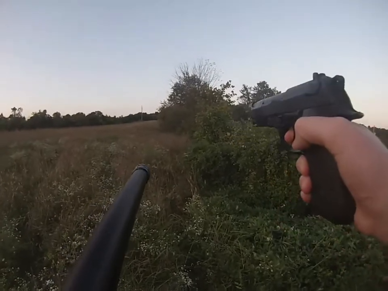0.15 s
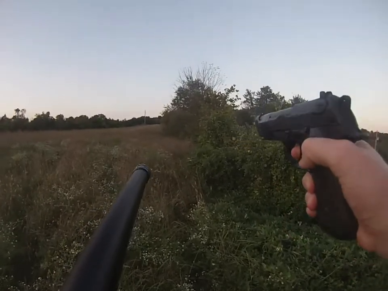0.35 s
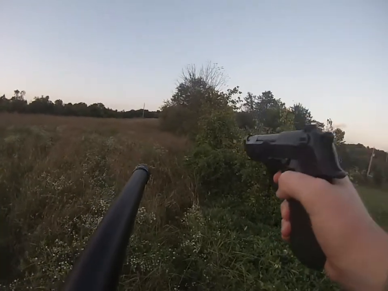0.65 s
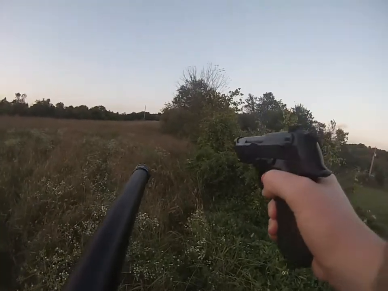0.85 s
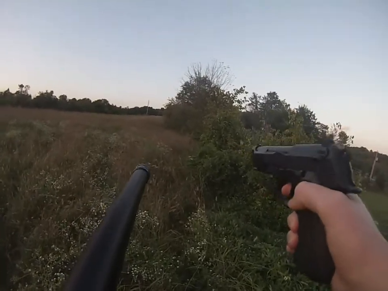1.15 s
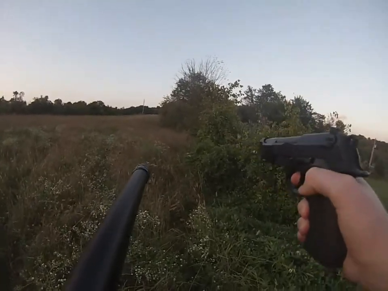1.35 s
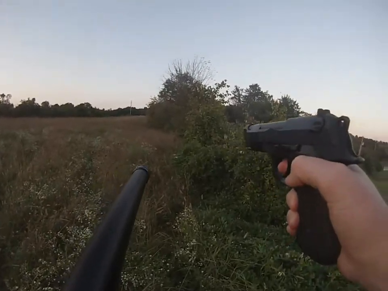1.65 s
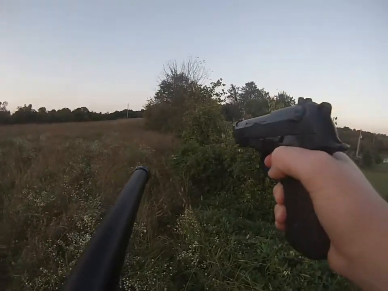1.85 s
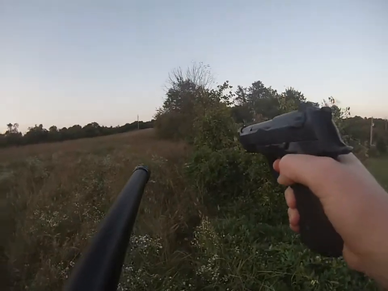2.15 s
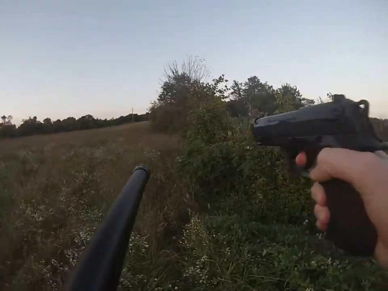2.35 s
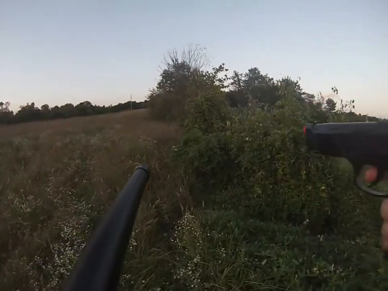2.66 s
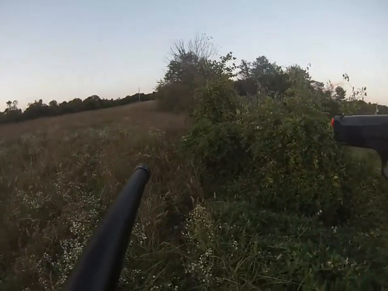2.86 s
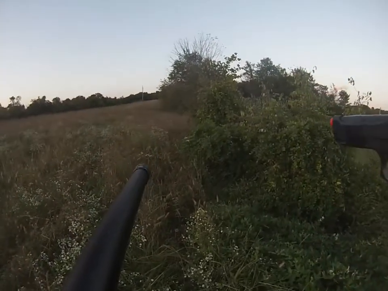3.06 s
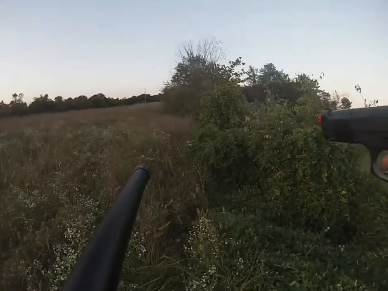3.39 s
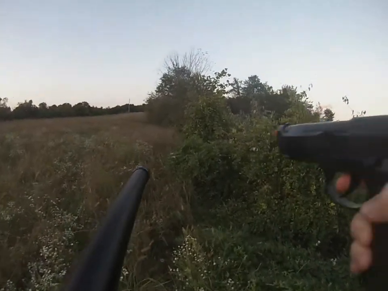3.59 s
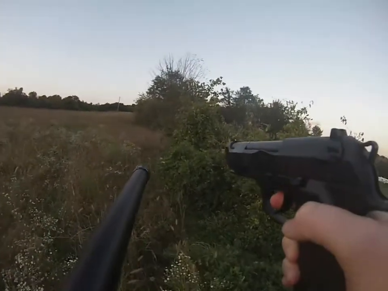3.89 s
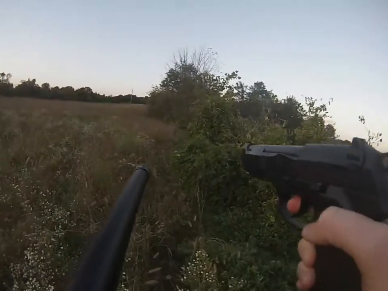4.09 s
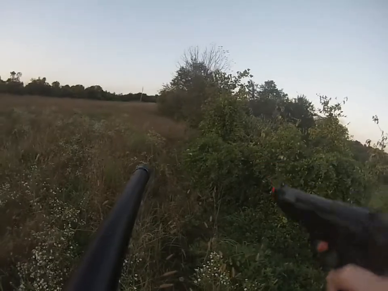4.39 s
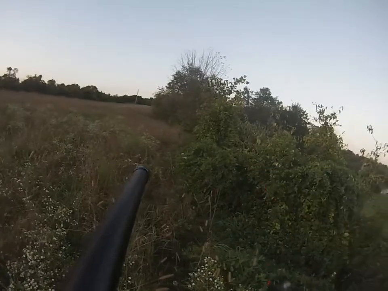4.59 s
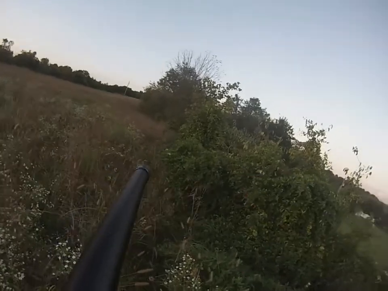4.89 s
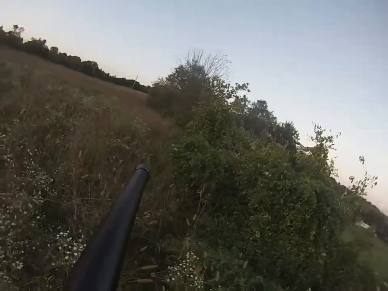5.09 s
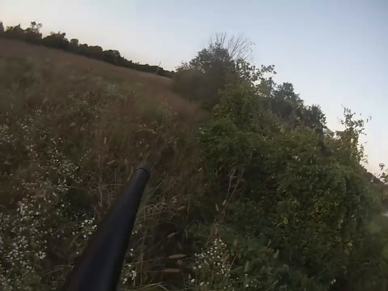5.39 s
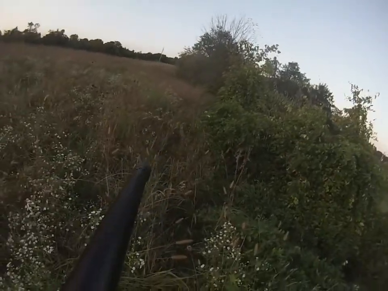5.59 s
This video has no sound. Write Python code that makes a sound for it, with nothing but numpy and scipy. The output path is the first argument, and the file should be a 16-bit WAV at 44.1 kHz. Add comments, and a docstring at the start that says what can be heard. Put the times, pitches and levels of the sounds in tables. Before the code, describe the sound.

A quiet outdoor creep through dry field grass. Small hollow plastic clicks and brief creaks are loudest and very near, with low thuddy body, bunching at about 2.8 and 5.3 seconds. Gentle brushing swells and tiny bright stalk snaps come between them. Far insects shimmer continuously behind soft wind rumble and airy rush. One open-air microphone, dry, no echo.

```python
"""A long camera mount ticks, creaks and sways against its plastic housing during a creep through dry grass.
Each slip rings decaying housing modes with a burst of grit; friction noise drives the same modes to creak.
Grainy noise makes the swishing stalks and leaf tips, and short pitched bursts make the snaps underfoot.
Behind them, pulsed tones form two far insect choruses, and shaped noise makes a light breeze."""
import sys
import numpy as np
from scipy import signal
from scipy.fft import rfft, irfft, next_fast_len
from scipy.io import wavfile
from scipy.ndimage import uniform_filter1d, map_coordinates

SR = 44100
rng = np.random.default_rng(int(sys.argv[2]) if len(sys.argv) > 2 else 0)


def waveform_to_disk(signal):
    """Save audio, clipped to [-1, 1], as 16-bit WAV at the path in sys.argv[1]."""
    frames = np.transpose(np.atleast_2d(signal))
    scaled = np.clip(frames, -1, 1) * 32767
    samples = np.round(scaled).astype(np.int16)
    wavfile.write(sys.argv[1], SR, samples)


N = 253134

# Slips of the mount: t/s, relative ring level/dB, hardness (about 0 to 1),
# breadth of contact (about -1 to 1, a few beyond), clack level/dB against the ring
SLIPS = [(0.321, -34, 0.65, 0.4, -5), (0.564, -52.5, 0.24, 2.4, -20), (0.647, -33.5, 0.23, -0.37, -28),
         (0.674, -38, 0.26, -.15, -27), (0.698, -47, .28, 0.83, -18), (1.05, -45.5, .22, -0.11, -21),
         (1.227, -35, 0.62, -0.38, -19), (1.28, -38, 0.2, 0.2, -21), (1.314, -54.5, 0.75, 1.2, 1.5),
         (2.46, -34, 0.54, -0.53, -19), (2.681, -24.5, 0, 0.37, -38), (2.72, -32, 0.38, -0.67, -21),
         (2.765, -38, 0.76, 0.66, -17), (2.792, -29.5, 0.4, 0.36, -18), (2.812, -26.5, 0.3, 1.65, -16),
         (2.818, -39.5, 0.2, 0.72, -19), (2.927, -42.5, 0.42, 0.081, -11), (2.955, -31, 0.99, -0.2, -11),
         (3.155, -30.5, 0.94, -0.12, -9), (3.61, -31.5, 0.96, -0.13, -16), (3.763, -29.5, 1, -0.0085, -12),
         (3.802, -33.5, .2, -0.066, -26), (3.823, -40.5, 0, 0.25, -24), (4.004, -29, 0.58, 0.6, -16),
         (4.087, -30.5, 0.24, 1.25, -25), (4.093, -29, 0.45, 1.06, -30), (4.587, -23, 1.06, 0.96, 4.5),
         (4.595, -35, .98, 1.7, -3), (4.73, -32.5, 0, -0.28, -17), (4.745, -29.5, 0, -0.079, -24),
         (4.985, -47, .05, -0.39, -24), (5.005, -42.5, 0.43, 0.25, -15), (5.053, -38, 0.03, -0.22, -31),
         (5.191, -49, 0.2, 0.69, -23), (5.272, -50, 0, .6, -16), (5.292, -24.5, 0.26, -0.33, -12),
         (5.299, -36.5, 0.89, 0.13, -6), (5.328, -33, 0.2, 0.48, -19), (5.344, -28, 0.37, 0.5, -23),
         (5.355, -24, 0.3, 0.29, -20), (5.364, -22.5, 0.1, 0.077, -10), (5.372, -24, 0.6, 0.23, -7),
         (5.397, -43.5, 0.84, 0.71, 4), (5.421, -29, 0.79, -0.082, -17)]
# Housing modes, one list per family (case ring, thud, body, knock, clack, tick):
# nominal f/Hz, relative level/dB, t60/s of a struck mode
HOUSING_MODES = [
    [(554, -9.5, 0.052), (687.8, -2, 0.043), (739.7, 1.5, 0.055)],
    [(272, 7.5, 0.063), (390, -15.5, 0.07)],
    [(907.6, 5.5, 0.044), (1007, -4, 0.058)],
    [(1310, 5.5, 0.024), (1448, 2.5, 0.032), (1600, 1, 0.025)],
    [(2140, 2, .026), (2290, 0.5, 0.026)],
    [(2977, -6, 0.024), (3510, 0, 0.024), (3823, 2.5, 0.019)],
]
# Level/dB against the ring of body, knock, tick: for a dull slip, added per hardness, added per breadth
DULL_LEVELS = [-14.5, -14.5, -27]
HARDNESS_GAINS = [6, 19, 27]
BREADTH_GAINS = [7.5, 1.5, -12.5]
# The thud grows slower than the ring (dB per dB) and thins with breadth
THUD_DB, THUD_GROWTH, THUD_BREADTH_DB = -37, 0.32, -8.5
SLIDE_S = 0.0035  # nominal build-up of a mode near 750 Hz
# Grit at each slip: dull level against the slip level, gain per hardness, decay time
CRUNCH_DB, CRUNCH_HARDNESS_DB, CRUNCH_T60_S = -14.5, 15, 0.013
# Colour of the slip grit: f/Hz, relative level/dB
CRUNCH_COLOUR = [(500, -18), (1000, 6.5), (1700, -0.5), (2600, -2.5), (4300, -12), (9000, -28)]

# Thin rings after two ticks: t/s, relative level/dB, first f/Hz, f/Hz it sinks towards, t60/s
THIN_RINGS = [(4.591, -47.5, 1485, 1423, 0.57), (5.425, -54, 1490, 1444, 0.33)]
# Second tone: offset above the first, level against it, its own extra decay
PARTNER_OFFSET_HZ, PARTNER_DB, PARTNER_T60_S = 150, 2, 0.25

# Rubs in the joint: t/s of the peak, relative level/dB, swell/s, fade/s
RUBS = [(0.688, -52, 0.0066, 0.045), (2.788, -41.5, 0.039, .006), (2.825, -45, 0.0047, 0.021),
        (3.812, -49, .005, 0.042), (4.762, -51, .005, 0.1), (5.004, -55, 0.043, .025),
        (5.06, -63, 0.04, 0.016), (5.21, -47.5, 0.12, .16), (5.361, -42, 0.086, 0.072)]
# Friction drive of each housing family, in the order of HOUSING_MODES: relative level/dB
RUB_DRIVE = [5.5, 0, -34, -15, -27, -44]
# Jolts that set the mount swinging: t/s, level/dB
JOLTS = [(1.05, -49), (1.247, -44.5), (2.8, -32), (2.871, -42), (4.129, -40.5), (4.251, -40.5)]
SWAY_HZ, SWAY_T60_S = 30.2, 1

# Legs sweeping through grass: t/s of the peak, relative stalk level/dB, relative tip level/dB, swell/s, fade/s
SWEEPS = [(0.3, -64, -66.5, 0.28, 0.34), (1.76, -67, -68.5, 0.28, 0.27), (2.05, -62, -67.5, 0.33, 0.34),
          (2.72, -65.5, -71, 0.22, 0.18), (3.33, -60.5, -66, 0.07, 0.14), (3.55, -59, -62, 0.21, 0.25),
          (4.7, -71, -74, 0.14, .06), (5.26, -68, -65, .07, 0.045)]
# Steady grass level between sweeps: relative level/dB of stalks, of leaf tips
CREEP_LEVELS = [-70, -72.5]
# Shake of the neighbours at a snap: level/dB of stalks and tips against the snap, fade/s
SHAKE_LEVELS = [-27, -36]
SHAKE_FADE_S = 0.017
# Colour of brushed stalks: f/Hz, relative level/dB
STALK_COLOUR = [(240, -13), (400, -2), (999, -4.5), (1410, -11.5), (2830, -5), (3940, -11.5), (5420, -4),
                (9060, -20), (11000, -41), (14300, -43), (22000, -120)]
# Colour of brushed leaf tips: f/Hz, relative level/dB
TIP_COLOUR = [(6000, -16), (9000, -14), (11500, -9), (13500, -16), (15400, -24)]
TIP_PATCH_DB, TIP_FLUTTER_DB = 2, 1.2

# Breaking stalks: t/s, peak level/dB, pitch f/Hz
STALK_SNAPS = [(0.4942, -36, 10500), (0.504, -46, 8500), (1.19, -48, 11000), (1.5056, -39, 5600),
               (1.7125, -48, 12500), (1.9844, -41, 6660), (2.0373, -36, 6190), (2.392, -38, 5600),
               (3.0561, -37.5, 6450), (3.4875, -49, 5700), (3.7504, -43, 5540), (3.948, -40, 5560),
               (3.9659, -48, 6670), (4.586, -50, 6430), (4.7017, -46, 5520), (4.8654, -53, 6000),
               (5.248, -47, 6280)]
SNAP_T60_CYCLES, CRACK_T60_S = 7.2, 0.0045

# Insect choruses: centre f/Hz, spread f/Hz, relative level/dB, average pulse rate/Hz
CHORUSES = [(4698, 330, -1.5, 50), (2613, 130, -9, 40)]
# Loudness of all singing over time: t/s, relative level/dB
SINGING_LEVEL = [(0.0, -62), (1.57, -61), (2.9, -61.5), (3.6, -60.5), (4.0, -61), (5.3, -61.5),
                 (5.74, -63.5)]

# Rush of the far field over time: t/s, relative level/dB
RUSH_LEVEL = [(0.0, -61), (1.2, -62), (1.6, -59), (2.0, -62), (2.3, -60), (2.9, -63), (3.2, -62),
              (3.8, -54.5), (4.3, -63.5), (4.62, -58.5), (5.0, -63.5), (5.35, -59.5), (5.74, -62)]
# Colour of that rush: f/Hz, relative level/dB
RUSH_COLOUR = [(80, -37), (170, -4.5), (280, -0.5), (500, -4.5), (1000, -5.5), (2000, -16), (4000, -20.5),
               (8000, -33), (15400, -37)]
# Colour of the low wind rumble: f/Hz, relative level/dB
RUMBLE_COLOUR = [(12, -12), (25, -5), (52, 0.5), (80, -9.5), (115, -6.5), (170, -14.5), (300, -23)]
RUMBLE_DB = -54

BAND_LIMIT_HZ = 15350


def ticks():
    """Each slip rings the housing; it builds over a short slide, faster in the high modes."""
    rings, grit = np.zeros(N + SR), np.zeros(N + SR)
    t = np.arange(SR // 5) / SR
    for s, db, hard, broad, clack_db in SLIPS:
        crunch_db = db + CRUNCH_DB + CRUNCH_HARDNESS_DB * hard
        crunch = amp(crunch_db - 60 * t / CRUNCH_T60_S) * np.minimum(t / 0.0018, 1)
        add(grit, s - 0.001, crunch)
        body_db, knock_db, tick_db = DULL_LEVELS + hard * np.array(HARDNESS_GAINS) + broad * np.array(BREADTH_GAINS)
        thud_db = THUD_DB + (THUD_GROWTH - 1) * db + THUD_BREADTH_DB * broad
        family_levels = [0, thud_db, body_db, knock_db, clack_db, tick_db]
        for family, family_db in zip(HOUSING_MODES, family_levels):
            hz, mode_db, t60 = np.transpose(family)[..., None]
            # Every slip strikes the modes a little differently
            detune, phase, scatter = rng.standard_normal((3, *hz.shape))
            rise = np.clip(t / (SLIDE_S * (750 / hz) ** 0.25 + 1e-4), 0, 1)
            tone = np.sin(2 * np.pi * hz * (1 + 0.019 * detune) * t + 0.64 * phase)
            level = amp(db + family_db + mode_db + 1.0 + 0.92 * scatter - 60 * t / t60)
            add(rings, s - 0.002, np.sum(level * np.sin(np.pi / 2 * rise) ** 2 * tone, axis=0))
    return rings[:N] + grit[:N] * coloured(rng.standard_normal(N), CRUNCH_COLOUR)


def whine():
    """A loose part keeps ringing unevenly, sinking a little in pitch."""
    out, t = np.zeros(N + SR), np.arange(SR // 3) / SR
    for s, db, first_hz, last_hz, t60 in THIN_RINGS:
        hz = last_hz + (first_hz - last_hz) * np.exp(-t / 0.06)
        tone = np.sin(2 * np.pi * np.cumsum(hz) / SR + 0.95 * wobble(90)[:len(t)])
        partner = np.sin(2 * np.pi * np.cumsum(hz + PARTNER_OFFSET_HZ) / SR)
        tone += amp(PARTNER_DB - 60 * t / PARTNER_T60_S) * partner
        level = amp(db - 60 * t / t60 + 1.9 * wobble(62)[:len(t)])
        add(out, s, level * np.minimum(t / 0.004, 1) * tone)
    return out[:N]


def creak():
    """Gritty friction in the joint sets the housing's modes humming."""
    modes = [(hz, db + drive_db, 1.5 / t60)  # the last is a resonance width in Hz
             for family, drive_db in zip(HOUSING_MODES, RUB_DRIVE) for hz, db, t60 in family]

    def housing(f):
        """Sum of resonances, with the treble rolled off by the soft contact."""
        body = sum(amp(db) * 1j * f * width / (hz * hz - f * f + 1j * f * width) for hz, db, width in modes)
        return body / (1 + (f / 3500) ** 6)

    rubbing = sum(amp(db) * swell(s, swell_s, fade_s) for s, db, swell_s, fade_s in RUBS)
    grit = uniform_filter1d(rubbing, size=300) * unit(crackle(3.5))
    return amp(14.0) * filtered(grit, housing)


def sway():
    """The long mount swings at its one low mode after a jolt."""
    out, t = np.zeros(N + 2 * SR), np.arange(SR) / SR
    for s, db in JOLTS:
        add(out, s, amp(db - 60 * t / SWAY_T60_S) * np.sin(2 * np.pi * SWAY_HZ * t))
    return out[:N]


def grass():
    """Brushed stalks and leaf tips hiss in fine grains, and shake when a stalk breaks."""
    # Powers add; row 0 is stalks, row 1 leaf tips
    sweeps = sum(amp(db)[:, None] ** 2 * swell(s, swell_s, fade_s) ** 1.47
                 for s, *db, swell_s, fade_s in SWEEPS)
    shakes = sum(amp(np.add(SHAKE_LEVELS, db))[:, None] ** 2 * swell(s, SHAKE_FADE_S / 2, SHAKE_FADE_S)
                 for s, db, _ in STALK_SNAPS)
    stalks_gain, tips_gain = np.sqrt(amp(CREEP_LEVELS)[:, None] ** 2 + sweeps + shakes)
    flutter = wobble(16)
    stalks = coloured(0.82 * unit(crackle(4.4)) + patchy(1.54), STALK_COLOUR)
    tips = coloured(0.76 * unit(crackle(4.8)) + patchy(TIP_PATCH_DB), TIP_COLOUR)
    stalks = stalks_gain * amp(7 + 0.2 * flutter) * stalks
    tips = tips_gain * amp(TIP_FLUTTER_DB * flutter) * tips
    return stalks + tips


def snaps():
    """A breaking stalk gives a few ms of noise around its own pitch."""
    out, t = np.zeros(N + SR), np.arange(SR // 50) / SR
    for s, db, hz in STALK_SNAPS:
        crack = rng.standard_normal(len(t)) * amp(-60 * t / CRACK_T60_S)
        ring = np.sin(2 * np.pi * hz * t) * amp(-60 * t * hz / SNAP_T60_CYCLES)
        burst = np.convolve(crack, ring)[:len(t)]
        add(out, s - 0.001, amp(db) * burst / np.abs(burst).max())
    return out[:N]


def insects():
    """Nine singers a chorus, each a pulsed tone of its own pitch and pace, drift in and out over a blur."""
    t, out = np.arange(N) / SR, np.zeros(N)
    for hz, spread_hz, db, pace in CHORUSES:
        choir = np.zeros(N)
        for place, speed, phase in zip(np.linspace(-1, 1, num=9), *rng.standard_normal((2, 9))):
            pulses = np.sin(np.pi * pace * (1 + 0.2 * speed) * t + phase) ** 2
            tone = np.sin(2 * np.pi * (hz + spread_hz * place) * t + 1.1 * wobble(50))
            choir += pulses * amp(0.87 * wobble(2.76)) * tone
        # Distant singers blur into a band of noise
        far = filtered(rng.standard_normal(N), lambda f: np.exp(-((f - hz) / spread_hz) ** 2))
        out += amp(db) * unit(0.71 * unit(choir) + unit(far))
    return amp(curve(SINGING_LEVEL)) * out


def breeze():
    """Air moves over the microphone as low rumble and through the far field as a patchy rush."""
    gusts = amp(0.61 * wobble(5.5))
    rumble = amp(RUMBLE_DB) * unit(gusts * coloured(patchy(1.43), RUMBLE_COLOUR))
    rush = amp(curve(RUSH_LEVEL) + 4) * coloured(patchy(3.16), RUSH_COLOUR)
    return rumble + rush


def amp(db):
    """Gain of a level in dB."""
    return 10 ** (np.asarray(db) / 20)


def unit(x):
    """x at rms 1."""
    return x / np.sqrt(np.mean(x ** 2) + 1e-20)


def curve(points):
    """Straight lines through (time in s, value) points, one value per sample."""
    s, values = np.transpose(points)
    return np.interp(np.arange(N) / SR, s, values)


def swell(s, swell_s, fade_s):
    """Rises from 0 to 1 at time s and falls back."""
    return np.interp(np.arange(N) / SR, [s - abs(swell_s), s, s + abs(fade_s)], [0, 1, 0])


def wobble(rate):
    """A smooth random curve, rate knots a second."""
    knots = rng.standard_normal(int(N * rate / SR) + 4)
    return map_coordinates(knots, [np.arange(N) * rate / SR])


def filtered(x, response):
    """x with its spectrum multiplied by a response of frequency in Hz."""
    m = next_fast_len(N + SR // 2)
    return irfft(rfft(x, m) * response(np.fft.rfftfreq(m, 1 / SR)), m)[:N]


def coloured(x, spectrum):
    """x shaped by (Hz, dB) points on a log axis, at rms 1."""
    f, db = np.transpose(spectrum)
    return unit(filtered(x, lambda hz: amp(np.interp(np.log(hz + 1), np.log(f), db, left=-120, right=-120))))


def patchy(depth_db):
    """White noise with patches of random gain in time and frequency."""
    z = signal.stft(rng.standard_normal(N), nperseg=512)[2]
    field = uniform_filter1d(rng.standard_normal(z.shape), size=6, axis=0)
    field = uniform_filter1d(field, size=10, axis=1)
    return signal.istft(z * amp(depth_db * unit(field)), nperseg=512)[1][:N]


def crackle(spread_db):
    """Noise whose loudness jumps about every millisecond."""
    grains = amp(spread_db * np.minimum(rng.exponential(size=N // 40 + 1), 4))
    return rng.standard_normal(N) * np.repeat(grains, repeats=40)[:N]


def add(track, s, sound):
    """Mixes a sound into a track at time s."""
    track[round(s * SR):][:len(sound)] += sound


def scene():
    """Everything reaches one microphone in open air."""
    mount = ticks() + whine() + creak() + sway()
    return (mount + grass() + snaps() + insects() + breeze())[None]


def record(dry):
    """The camera keeps nothing above its band limit."""
    return filtered(dry[0], lambda hz: hz < BAND_LIMIT_HZ)[None]


dry = scene()
out = record(dry)
waveform_to_disk(out)
```